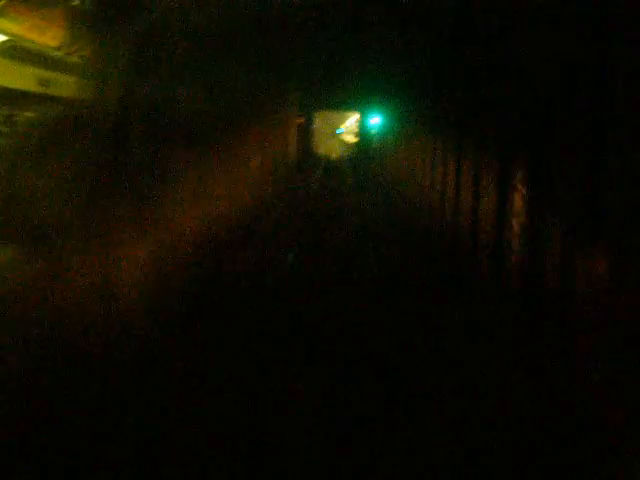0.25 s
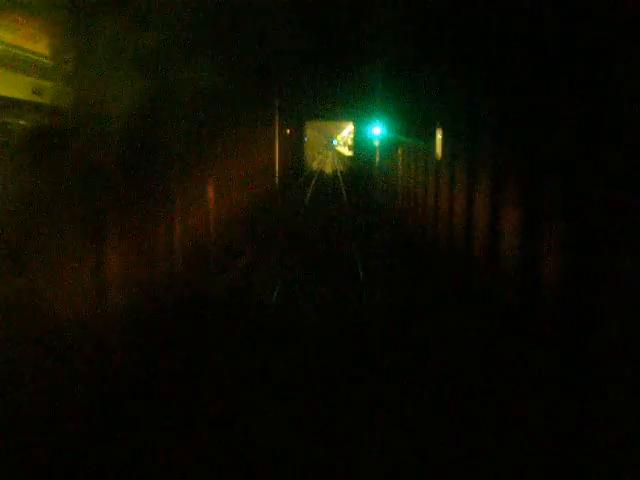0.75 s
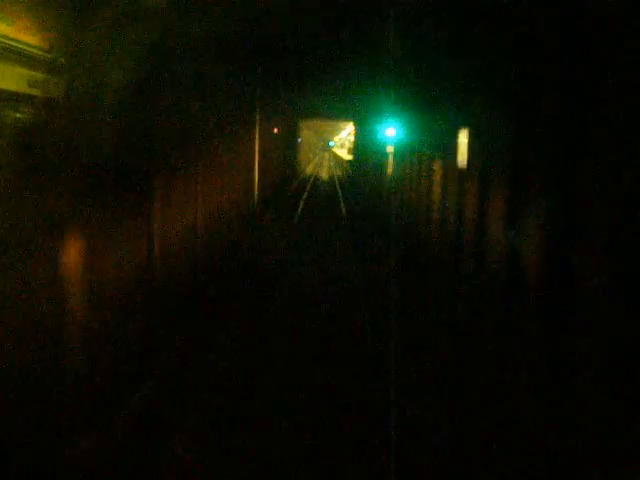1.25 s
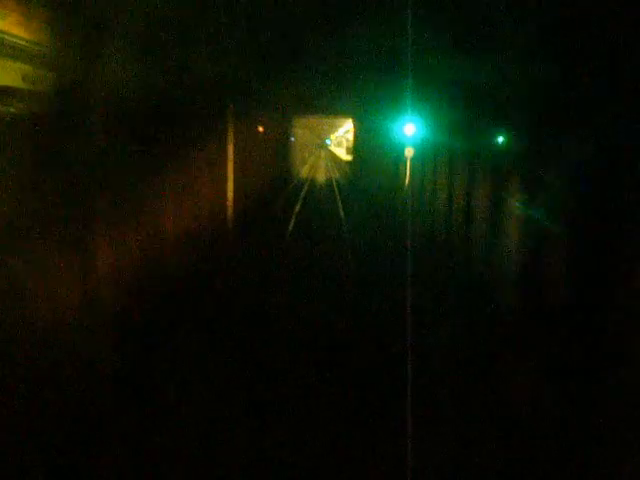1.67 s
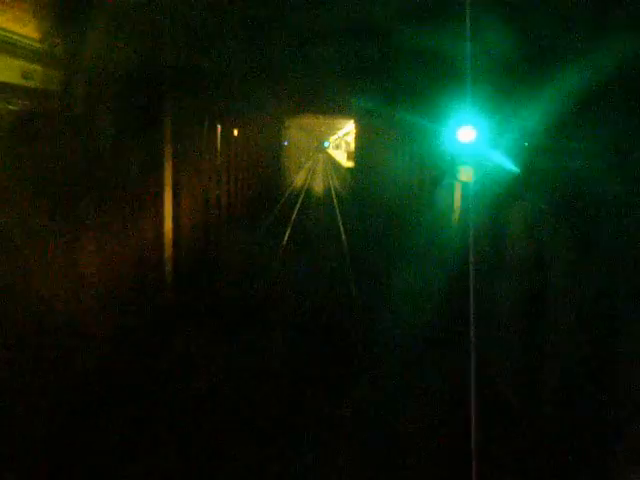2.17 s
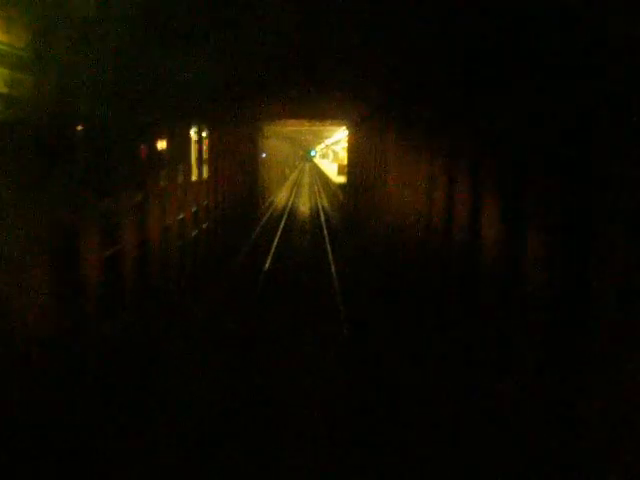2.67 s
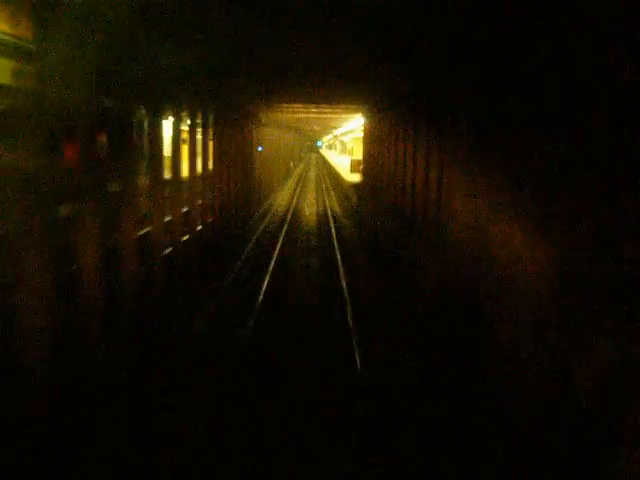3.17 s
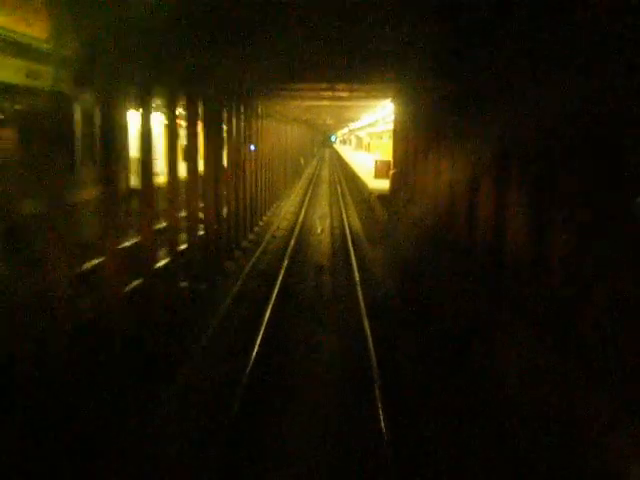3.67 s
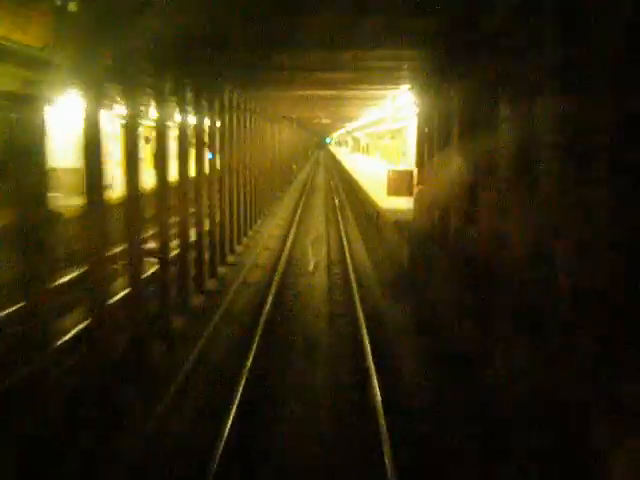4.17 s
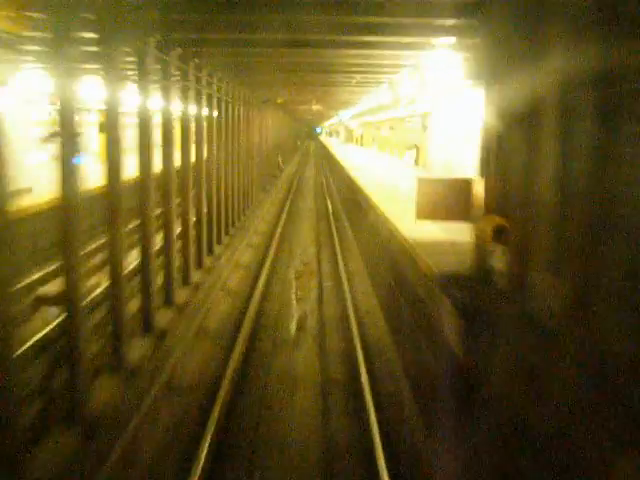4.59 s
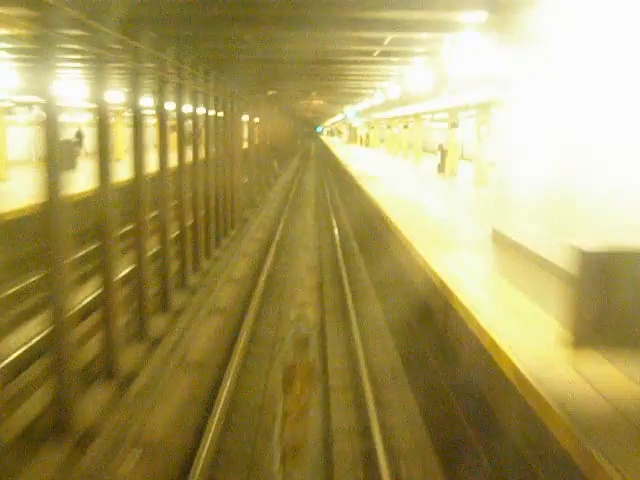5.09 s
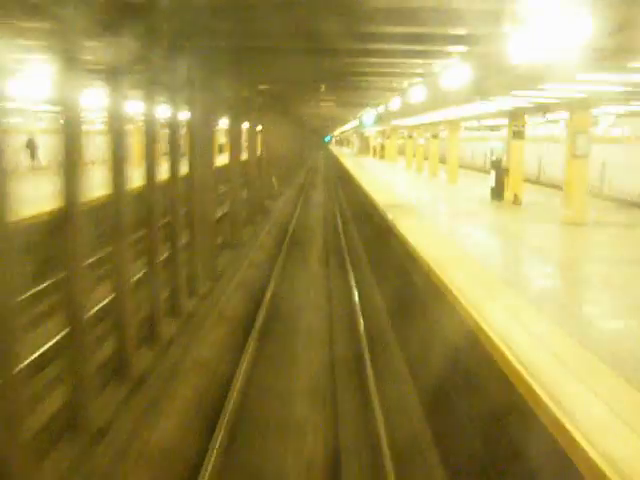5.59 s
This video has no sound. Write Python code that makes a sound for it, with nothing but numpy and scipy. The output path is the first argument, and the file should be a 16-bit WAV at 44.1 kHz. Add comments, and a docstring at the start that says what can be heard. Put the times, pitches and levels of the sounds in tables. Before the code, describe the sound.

A subway car runs fast through a tunnel, heard from inside on a small, easily overloaded microphone. From the start a loud, dull roar, strongest in the low mids, covers nearly everything, shivering in rapid swells and brief dips. Beneath is a weak boom of the body; above, a faint, grainy wheel ring. Hard jolts hit at 0.1-0.2 s, cluster at 0.5-0.9 s, and recur from 1.25 to 2.9 s, each a short blunt knock flattened into distortion with a dry crackle. A loose fitting clacks brightly at 1.93 s and again at 2.27 s, with fainter ticks around. Tiny squeaks surface near 1.2, 1.9, 2.2 and 2.5-2.7 s. After 3.5 s the roar drops a few decibels, and chatter shows a little more around 3.9-4.3 s. Choppy surges follow, a thin squeak glides down at 4.87 s, jolts return at 4.87, 5.63 and 5.76 s, and the rumble continues to the end.

```python
"""Subway car in a tunnel

We ride inside a subway car at speed. Rough rails shake the floor (a roar), the body (a low boom) and the
wheels (a faint ring), all made of filtered noise. Jolts are short pushes that overload a small narrow-band
recorder: its flat tops come with clicks and faint treble noise that dies away after each, over a faint hiss.
A loose fitting ticks and chatters as short ringing tones, and rubbing metal squeaks as thin gliding tones.
"""
import sys
import numpy as np
from scipy import signal
from scipy.fft import rfft, irfft, next_fast_len
from scipy.io import wavfile
from scipy.ndimage import uniform_filter1d, map_coordinates

SR = 44100
rng = np.random.default_rng(int(sys.argv[2]) if len(sys.argv) > 2 else 0)


def transcribe(signal):
    """Save signal, clipped to [-1, 1], as a 16-bit WAV file at the path in sys.argv[1]."""
    frames = np.atleast_2d(signal).T
    limited = np.clip(frames, -1, 1)
    pcm = np.round(limited * 32767).astype(np.int16)
    wavfile.write(sys.argv[1], SR, pcm)


N = 256662  # length in samples

# Rolling noise before swells and dips: time_s, roar_db, wheel_ring_db, boom_db
ROLLING_LEVELS = [(0, -14, -38.5, -36.5), (.6, -14.5, -37, -37), (1.3, -14.5, -37.5, -35.5),
                  (2.1, -14.5, -37.5, -37), (2.9, -15, -39.5, -38.5), (3.3, -17, -40.5, -33.5),
                  (3.52, -16, -41, -38), (3.6, -19, -42.5, -36), (4.1, -20, -42, -35.5),
                  (4.75, -19, -42, -35), (5.15, -16, -40.5, -37), (5.45, -18, -42, -31),
                  (5.82, -17.5, -42.5, -33.5)]
# Short swells of the rolling noise: middle_s, rise_db, half_length_s
SHORT_SWELLS = [(0.154, 4, 0.032), (0.241, 4, 0.0072), (0.277, 0.5, 0.059), (0.493, 4, 0.04),
                (0.555, 4.5, 0.0064), (0.651, 1.5, 0.078), (0.74, 3, 0.023), (1.082, 3, 0.02),
                (1.185, 5, 0.011), (1.255, 4, 0.0096), (1.323, 5.5, 0.0053), (1.379, 4, 0.0086),
                (1.431, 2.5, 0.04), (1.495, 2.5, 0.0083), (1.566, 4.5, 0.03), (1.78, 1.5, 0.012),
                (1.876, 2, 0.036), (1.958, 7, 0.012), (1.98, 2, 0.008), (2.047, 6, 0.013),
                (2.121, 4, 0.0069), (2.139, 2.5, 0.047), (2.215, 0, 0.008), (2.241, 2.5, 0.008),
                (2.393, 3, 0.014), (2.456, 2, 0.0058), (2.578, 2.5, 0.04), (2.734, 5, 0.018),
                (2.838, 4.5, 0.014), (2.889, 2.5, 0.0057), (2.927, 6, 0.052), (3.065, 4, 0.031),
                (3.199, 3, 0.043), (3.338, 3, 0.031), (3.378, 5, 0.006), (3.468, 3.0, 0.013),
                (3.508, 3.5, 0.037), (3.538, 3.5, 0.0058), (3.608, 3.0, 0.012), (3.668, 2.5, 0.058),
                (3.811, 3.5, 0.011), (3.901, 6, 0.044), (3.947, 2, 0.0088), (4.031, 4, 0.024),
                (4.19, 4, 0.018), (4.268, 5.5, 0.018), (4.348, 8.5, 0.03), (4.396, 7.5, 0.008),
                (4.464, 3.5, 0.016), (4.564, 4.5, 0.0057), (4.625, 5.5, 0.014), (4.759, 9.5, 0.0065),
                (4.789, 5, 0.0081), (4.877, 7.5, 0.036), (4.935, 7, 0.011), (5.035, 1.5, 0.0073),
                (5.068, 4, 0.015), (5.132, 2.0, 0.028), (5.178, 5.5, 0.0074), (5.262, 5.0, 0.04),
                (5.338, 3.5, 0.017), (5.386, 1, 0.007), (5.412, 3, 0.045), (5.563, 8.5, 0.0064),
                (5.629, 5.5, 0.015), (5.763, 4, 0.061)]
# The rolling noise dips briefly: middle_s, drop_db, half_length_s
BRIEF_DIPS = [(0.034, 5, 0.015), (0.351, 4.0, 0.0063), (0.583, 5.5, 0.0091), (0.958, 4, 0.02),
              (1.339, 4, 0.0094), (1.632, 2.5, 0.016), (1.71, 4, 0.014), (2.067, 4, 0.008),
              (2.099, 5, 0.008), (2.275, 2.5, 0.0074), (2.702, 5.5, 0.007), (2.913, 7.5, 0.0092),
              (3.019, 4.5, 0.006), (3.105, 7, 0.0064), (3.364, 3.0, 0.008), (3.418, 4, 0.014),
              (3.558, 5, 0.008), (3.572, 6, 0.017), (3.594, 4, 0.0068), (3.755, 2.5, 0.015),
              (3.921, 5, 0.01), (4.065, 7.5, 0.0082), (4.121, 6.5, 0.018), (4.226, 1.5, 0.0092),
              (4.372, 6, 0.0094), (4.446, 6, 0.0088), (4.721, 6.5, 0.012), (4.961, 5.5, 0.0057),
              (5.011, 7, 0.011), (5.406, 4.5, 0.0073), (5.492, 4, 0.015)]
# Colour of the roar as the floor passes it: pitch_hz, level_db (per Hz)
FLOOR_COLOUR = [(60, -39), (110, -13.5), (170, -3), (230, 1.5), (450, -1.5), (640, -2), (740, -11.5),
                (830, -19), (930, -17.5), (1050, -26), (1300, -33.5), (2000, -57.5)]
# Deeper floor panels against the higher ones: time_s, gain_db
DEEP_PANELS = [(0, 0), (.3, -.5), (.6, 0), (.9, .5), (1.2, 0), (1.5, -.5), (1.8, 0), (2.1, -0.5), (2.4, 0),
               (2.7, .5), (3, -0.5), (3.3, 1), (3.5, 1.5), (3.7, 1.5), (4, .5), (4.3, 1), (4.6, .5),
               (4.9, -.5), (5.2, 0), (5.5, 0), (5.82, 0)]
# Colour of the body's sway and boom: pitch_hz, level_db (per Hz)
BODY_COLOUR = [(5, -23.5), (27, -19), (35, -3), (60, -1.5), (100, 1.5), (160, -1.5), (300, -35.5)]
# The slowest sway against the boom: time_s, gain_db
SLOW_SWAY = [(0, -4), (2.6, -4), (3.2, 4), (4.6, 3), (4.9, -1), (5.82, -1)]
# Broad wheel and rail resonances: pitch_hz, width_hz, level_db
WHEEL_MODES = [(1130, 400, -9), (1659, 336, 1), (1925, 332, 0), (2506, 900, -15), (3360, 550, -16.5)]
# Hardest jolts of wheel on rail, before the overload: time_s, peak_db, direction (1 up, -1 down), pitch_hz
HARD_JOLTS = [(0.1158, -4.02, 1, 430), (0.1168, -8.0, -1, 300), (0.1487, -1.96, -1, 360),
              (0.1592, -2.08, 1, 330), (0.1714, -2.61, -1, 370), (0.4758, -2.46, 1, 430),
              (0.4826, -2.04, -1, 480), (0.5027, -3.14, 1, 460), (0.5133, -2.82, -1, 540),
              (0.5144, -7.02, 1, 330), (0.5209, -3.37, -1, 480), (0.5517, -2.55, -1, 400),
              (0.6519, -7.04, -1, 390), (0.653, -6.66, 1, 410), (0.7162, -3.08, -1, 420),
              (0.7556, -2.3, 1, 310), (0.8322, -9.79, -1, 380), (0.8334, -2.13, 1, 300),
              (0.9005, -3.36, -1, 330), (0.9178, -2.7, 1, 340), (1.2569, -1.26, -1, 410),
              (1.3219, -0.97, 1, 410), (1.5293, -3.17, 1, 390), (1.5672, -3.22, 1, 390),
              (1.5829, -1.39, -1, 430), (1.7755, -2.67, 1, 410), (1.862, -1.72, -1, 360),
              (1.9014, -3.31, -1, 390), (1.9822, -7.01, 1, 410), (1.9833, -6.2, -1, 330),
              (2.0883, -3.37, -1, 430), (2.1161, -2.92, -1, 390), (2.1247, -3.28, 1, 300),
              (2.2115, -2.62, 1, 450), (2.2174, -3.28, -1, 480), (2.2403, -1.44, -1, 380),
              (2.3794, -3.38, -1, 380), (2.3975, -2.77, 1, 320), (2.4574, -3.1, 1, 510),
              (2.5589, -3.24, 1, 350), (2.6135, -2.36, -1, 440), (2.7262, -3.29, 1, 360),
              (2.7375, -2.51, -1, 410), (2.7394, -2.0, 1, 370), (2.825, -3.31, -1, 390),
              (2.9313, -2.59, -1, 400), (3.4802, -2.87, 1, 360), (3.5227, -3.26, 1, 510),
              (3.6661, -1.67, -1, 360), (4.8656, -3.24, 1, 430), (4.8781, -3.22, 1, 380),
              (5.6291, -6.47, 1, 380), (5.6303, -5.41, -1, 290), (5.7589, -2.55, 1, 380)]
# Single ticks of a loose fitting: start_s, level_db
FITTING_TICKS = [(0.4653, -34.5), (1.6661, -26), (1.9314, -13.5), (1.9338, -22), (2.2688, -20),
                 (3.1278, -27.5), (3.2444, -42), (3.38, -39), (3.552, -28), (3.6114, -45), (3.8892, -24),
                 (3.9387, -25), (4.0113, -30), (4.2984, -33.5), (4.3281, -32), (5.5638, -34)]
# How the fitting rings: pitch_hz, level_db, t60_s (time to fall 60 dB)
FITTING_MODES = [(2170, 0.5, 0.01), (2700, -9.5, 0.014), (3184, -5, 0.012)]
# Lowest level of the faint chatter: time_s, level_db
CHATTER_LEVELS = [(0, -53), (1.5, -45), (3.5, -46), (3.9, -39), (4.5, -41.5), (5, -46), (5.82, -44.5)]
# Short squeaks of rubbing metal: start_s, length_s, start_hz, end_hz, level_db (average, roughly)
METAL_SQUEAKS = [(1.167, .03, 2835, 2810, -49), (1.23, 0.045, 2825, 2808, -45.5),
                 (1.915, .016, 1760, 1770, -32.5), (2.195, .02, 2800, 2798, -51),
                 (2.233, 0.036, 2810, 2800, -47), (2.54, 0.024, 2820, 2825, -51),
                 (2.563, 0.045, 2805, 2780, -44), (2.713, 0.023, 1380, 1366, -35),
                 (4.863, .074, 1677, 1535, -31.5)]
# Colour of the crackle at each overload: pitch_hz, level_db (per Hz)
CRACKLE_COLOUR = [(3000, -5), (5000, 0), (9000, -8.5), (15000, -19.5)]
# Dry clicks in the treble: time_s, level_db (before the low end is taken off)
TREBLE_CLICKS = [(0.1871, -39), (1.3869, -36)]
# Colour of the recorder's faint hiss: pitch_hz, level_db (per Hz)
HISS_COLOUR = [(3000, -2), (5000, 0), (7400, -1), (8200, -14), (10000, -24), (15000, -29.5)]

DEEP_HZ, SWAY_HZ = 380, 48  # where the deeper panels end, where the slow sway ends
EVENNESS = 0.4  # how far the roar holds its strength between swells, 0-1
FLOOR_LIMIT = .58  # size that the floor's swings hardly pass
RING_FOLLOWS, BOOM_FOLLOWS = 0.74, 0.12  # dB for each dB of swell in the roar
BOOM_WANDER_DB = 1
THUD_HZ = 90  # the springs absorb the jolts below this
CHATTER_PER_S, CHATTER_SPREAD_DB = 90, 10.5
CRACK_DB, CRACK_T60_S = -3, .005  # the contact itself: level over the modes, time to fall 60 dB
SQUEAK_ROUGH_DB, SQUEAK_WAVER = 2, .004  # flutter of level, share of pitch
BAND_HZ = 3900  # top of the recorder's narrow band
CLIP_LOW, CLIP_HIGH = -.672, .682  # where the recorder overloads
CRACKLE_DB, CRACKLE_DECAY_S = -53, 0.00061  # ragged burst at each overload
TREBLE_TAIL_DB, TREBLE_TAIL_DECAY_S = -71, 0.009  # faint treble noise that dies away after each click
HISS_STEADY_DB, HISS_FOLLOWING_DB = -91.5, -62
TOP_HZ, DULL_HZ = 15200, 15000  # the sound ends at the first, the treble sags around the second


def floor_roar(level_db, bumps):
    """Rail bumps shake the floor panels, which shape noise into a roar."""
    roar = filtered(amp(bumps) * patchy(0.62), lambda hz: amp(along(FLOOR_COLOUR, hz)))
    # Divide by part of the local strength to even out the roar
    power = uniform_filter1d(uniform_filter1d(roar ** 2, size=500), size=500)
    roar = roar / np.abs(power) ** (EVENNESS / 2)
    roar = roar + (amp(curves(DEEP_PANELS)[0]) - 1) * low_part(roar, DEEP_HZ, 6)
    roar = amp(level_db) * unit(roar)
    # Rubber mounts damp the widest swings of the floor
    swing = uniform_filter1d(np.abs(signal.hilbert(roar, next_fast_len(N))[:N]), size=40)
    return roar / (1 + (swing / FLOOR_LIMIT) ** 8) ** (1 / 8)


def wheel_resonance(hz):
    """Sum the broad resonances of wheel and rail, with alternating signs."""
    total = 0
    for k, (center, width, db) in enumerate(WHEEL_MODES):
        damping = 1j * hz * width
        total = total + (-1) ** k * amp(db) * damping / (center * center - hz * hz + damping)
    return total


def wheel_ring(level_db, bumps):
    """Small flaws strike the wheel's tread, and its resonances ring faintly."""
    grit = amp(1.4 * bumps + wobble(150))
    return amp(level_db) * unit(filtered(grit * patchy(1.0), wheel_resonance))


def body_boom(level_db):
    """The car body sways and booms as low noise."""
    boom = filtered(patchy(1.0), lambda hz: amp(along(BODY_COLOUR, hz)))
    boom = boom + (amp(curves(SLOW_SWAY)[0]) - 1) * low_part(boom, SWAY_HZ, 6)
    return amp(level_db + BOOM_WANDER_DB * wobble(9.8)) * unit(boom)


def rolling():
    """Rail roughness shakes floor, wheels and body; the same swells lift all three."""
    roar_db, ring_db, boom_db = curves(ROLLING_LEVELS)
    swell_db = humps(SHORT_SWELLS) - humps(BRIEF_DIPS)
    bumps = 0.1 * wobble(12) + 0.83 * wobble(45)
    roar = floor_roar(roar_db + swell_db, bumps)
    ring = wheel_ring(ring_db + RING_FOLLOWS * swell_db, bumps)
    boom = body_boom(boom_db + BOOM_FOLLOWS * swell_db)
    return roar + boom, ring


def jolted(floor, light):
    """Jolts push the floor for about one swing, replacing the roar and, at the crest, the lighter sounds."""
    push, rest, crest = np.zeros(N), np.ones(N), np.ones(N)
    t = np.arange(-400, 400) / SR
    mean = np.exp(-(np.pi / 2) ** 2)  # taken off, so that the floor comes back to rest
    for s, db, side, hz in HARD_JOLTS:
        swing = (np.cos(2 * np.pi * hz * t) - mean) / (1 - mean)
        add(push, s + t[0], side * amp(db) * swing * np.exp(-(t * hz / .5) ** 2))
        add(rest, s + t[0], -np.exp(-(t * hz / .7) ** 4))
        add(crest, s + t[0], -.9 * np.exp(-(t * hz / .2) ** 2))
    rest = np.clip(rest, 0, 1)
    thud = low_part(push + (rest - 1) * floor, THUD_HZ, 4)
    return push + rest * (floor - thud) + np.clip(crest, 0, 1) * light


def ticks():
    """A loose fitting ticks and chatters: each hard contact cracks and rings three short modes."""
    out, t = np.zeros(N), np.arange(SR // 20) / SR
    band = signal.butter(2, [1600, 3800], 'band', fs=SR, output='sos')
    grit = unit(signal.sosfilt(band, rng.standard_normal(N + SR)))
    contacts = list(FITTING_TICKS)
    # The chatter falls at random moments, at random levels up to the spread above the lowest one
    for place, extra in rng.random((round(CHATTER_PER_S * N / SR), 2)):
        s = place * N / SR
        contacts.append((s, np.interp(s, *np.transpose(CHATTER_LEVELS)) + CHATTER_SPREAD_DB * extra))
    variations = rng.standard_normal((len(contacts), len(FITTING_MODES), 2))
    for (s, db), variation in zip(contacts, variations):
        sound = amp(CRACK_DB - 60 * t / CRACK_T60_S) * grit[round(s * SR):][:len(t)]
        for (hz, level_db, t60), (vary_db, detune) in zip(FITTING_MODES, variation):
            tone = np.sin(2 * np.pi * hz * (1 + 0.03 * detune) * t)
            sound = sound + amp(level_db + vary_db - 60 * t / t60) * tone
        add(out, s, amp(db) * sound * (1 - np.exp(-t / 0.00098)))  # soft start
    return out


def squeaks():
    """Rubbing metal makes thin gliding tones that catch, flutter and fade."""
    out = np.zeros(N)
    flutter = amp(SQUEAK_ROUGH_DB * wobble(120))
    waver = 1 + SQUEAK_WAVER * wobble(150)
    for s, length, start_hz, end_hz, db in METAL_SQUEAKS:
        u = np.linspace(0, 1, round(length * SR))
        hz = (start_hz + (end_hz - start_hz) * u) * waver[round(s * SR):][:len(u)]
        fade = np.sin(np.pi * u ** 0.79) ** 0.45
        add(out, s, amp(db + 1.5) * fade * np.sin(2 * np.pi * np.cumsum(hz) / SR))
    return out * flutter


def overload_crackle(cut):
    """Each overload brings a ragged burst and faint treble noise that dies away, driven by what was cut off."""
    tail = np.abs(lingering(cut, TREBLE_TAIL_DECAY_S) ** .5)
    burst = np.abs(lingering(cut, CRACKLE_DECAY_S)) ** 0.82 * amp(3.3 * wobble(900))
    noise = filtered(rng.standard_normal(N), lambda hz: amp(along(CRACKLE_COLOUR, hz)) * (hz > BAND_HZ / 2))
    return (amp(CRACKLE_DB) * burst + amp(TREBLE_TAIL_DB) * tail) * unit(noise)


def treble_clicks():
    """Single-sample clicks keep only their treble."""
    clicks = np.zeros(N)
    for s, db in TREBLE_CLICKS:
        clicks[round(s * SR)] += amp(db)
    return clicks - low_part(clicks, BAND_HZ, 8)


def recorder_hiss(narrow):
    """The recorder hisses faintly, with a steady part and a part that follows the level."""
    loudness = uniform_filter1d(np.abs(narrow), size=1500)
    noise = filtered(rng.standard_normal(N), lambda hz: amp(along(HISS_COLOUR, hz)))
    return (amp(HISS_STEADY_DB) + amp(HISS_FOLLOWING_DB) * loudness ** 2) * unit(noise)


def amp(db):
    """Turn decibels into a plain factor."""
    return 10 ** (np.asarray(db) / 20)


def unit(x):
    """Scale a sound to an average (rms) strength of 1."""
    return x / np.sqrt(np.mean(x ** 2) + 1e-20)


def along(points, hz):
    """Read a (pitch_hz, value) table on a log pitch axis."""
    f, v = np.transpose(points)
    return np.interp(np.log(hz + 1), np.log(f + 1), v)


def curves(rows):
    """Give one value per sample for each column after the time."""
    s, *columns = np.transpose(rows)
    return [np.interp(np.arange(N) / SR, s, column) for column in columns]


def humps(rows):
    """Add bell-shaped humps into one dB curve."""
    t = np.arange(N) / SR
    return sum(db * np.exp(-((t - s) / half) ** 2) for s, db, half in rows)


def wobble(rate):
    """Draw a smooth random curve with rate knots a second."""
    knots = rng.standard_normal(int(N * rate / SR) + 4)
    return map_coordinates(knots, [np.arange(N) * rate / SR])


def filtered(x, response):
    """Multiply the spectrum of x by a response of frequency."""
    m = next_fast_len(N + SR // 2)
    return irfft(rfft(x, m) * response(np.fft.rfftfreq(m, 1 / SR)), m)[:N]


def low_part(x, edge_hz, steepness):
    """Keep what lies below edge_hz."""
    return filtered(x, lambda hz: 1 / (1 + (hz / edge_hz) ** steepness))


def lingering(x, decay_s):
    """Let every value die away exponentially."""
    return signal.lfilter([1], [1, -np.exp(-1 / (decay_s * SR))], x)


def patchy(patchy_db):
    """White noise with patches of random gain in time and frequency."""
    z = signal.stft(rng.standard_normal(N + 512), nperseg=512)[2]
    field = uniform_filter1d(rng.standard_normal(z.shape), size=4, axis=0)
    field = uniform_filter1d(field, size=6, axis=1)
    return signal.istft(z * amp(patchy_db * unit(field)), nperseg=512)[1][:N]


def add(track, s, sound):
    """Mix a sound into the track from time s."""
    part = track[max(round(s * SR), 0):][:len(sound)]
    part += sound[:len(part)]


def scene():
    """The rolling car with its jolts, ticks and squeaks."""
    floor, ring = rolling()
    return jolted(floor, ring + ticks() + squeaks())[None]


def record(dry):
    """Narrow the band first, then overload hard: the flat tops spray clicks above the band."""
    narrow = low_part(dry[0], BAND_HZ, 24)
    clipped = np.clip(narrow, CLIP_LOW, CLIP_HIGH)
    cut = np.abs(narrow - clipped)
    flat = clipped - .006  # small constant offset
    mix = flat + recorder_hiss(narrow) + overload_crackle(cut) + treble_clicks()
    return filtered(mix, lambda hz: 1 / (1 + (hz / TOP_HZ) ** 40) / np.sqrt(1 + (hz / DULL_HZ) ** 4))[None]


dry = scene()
out = record(dry)
transcribe(out)
```